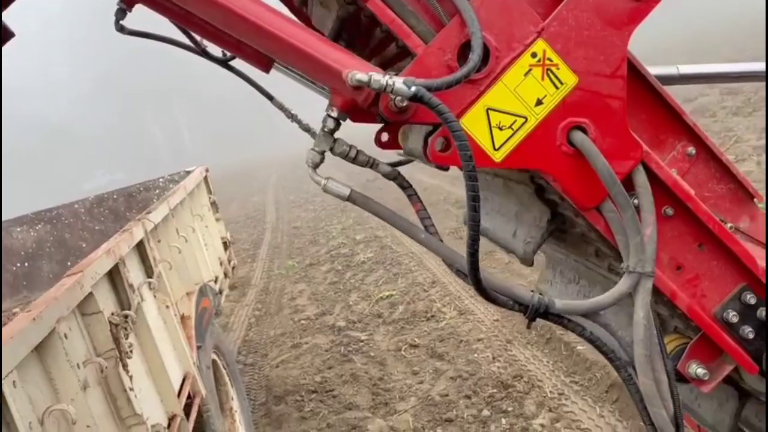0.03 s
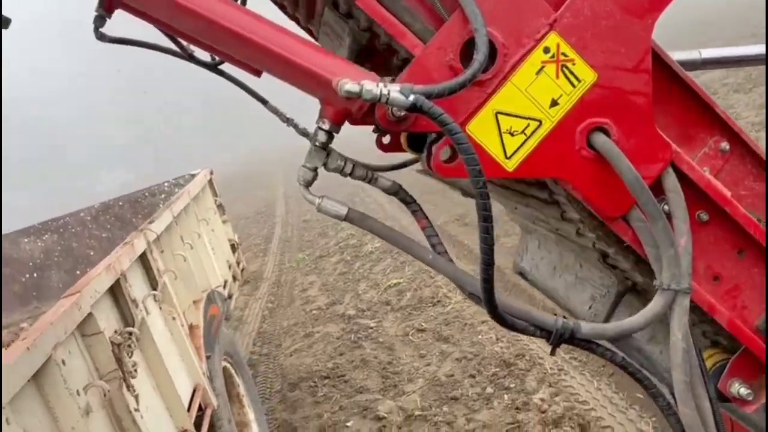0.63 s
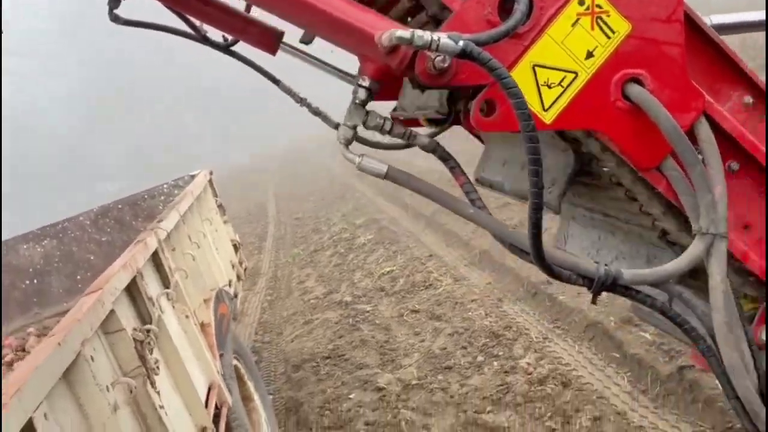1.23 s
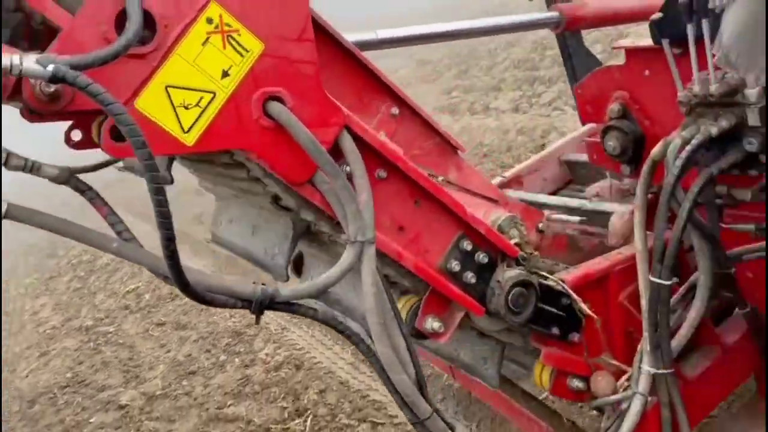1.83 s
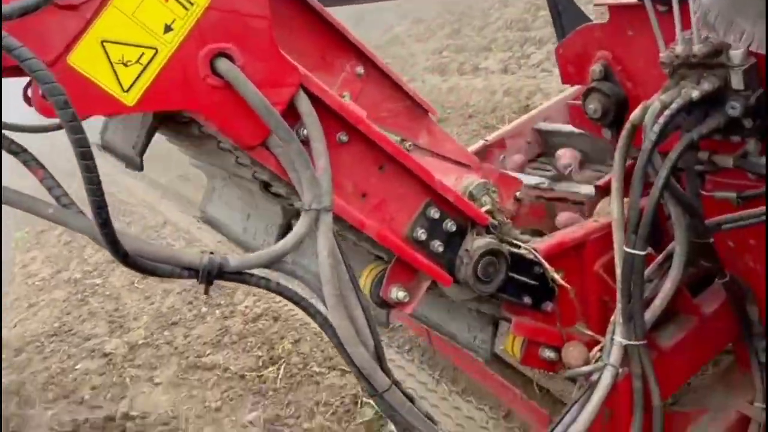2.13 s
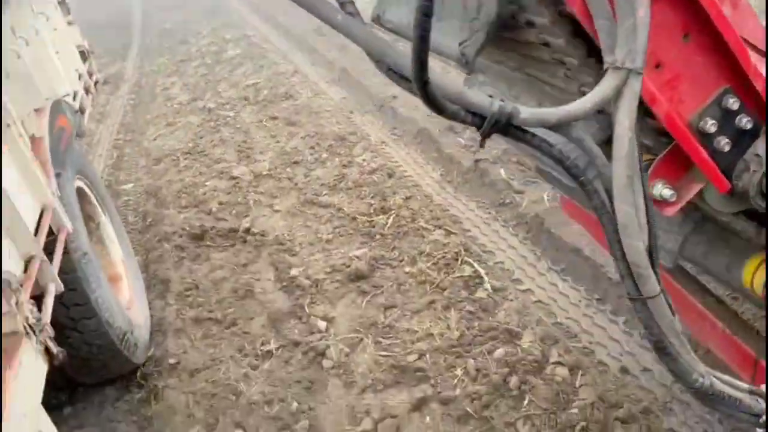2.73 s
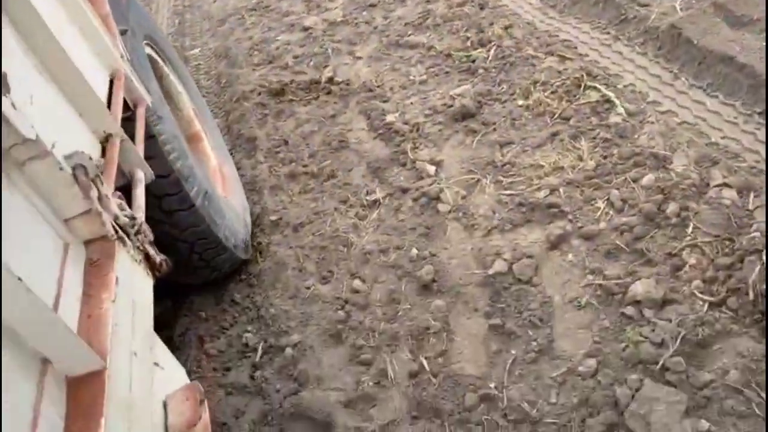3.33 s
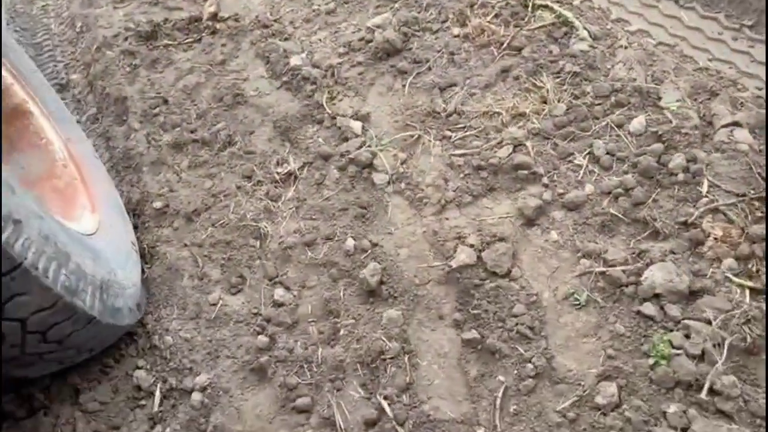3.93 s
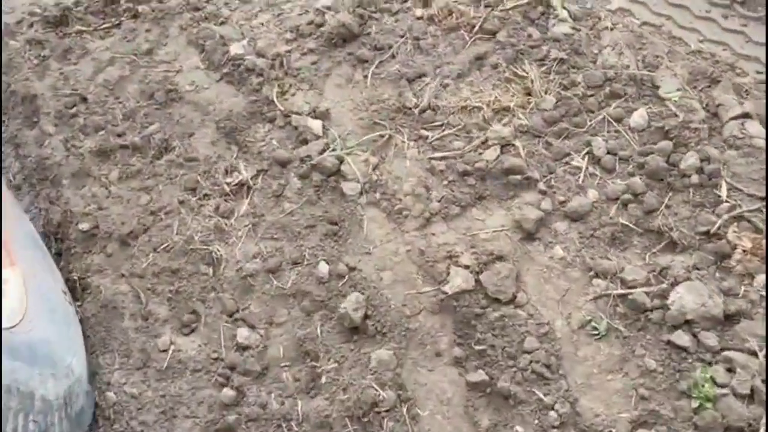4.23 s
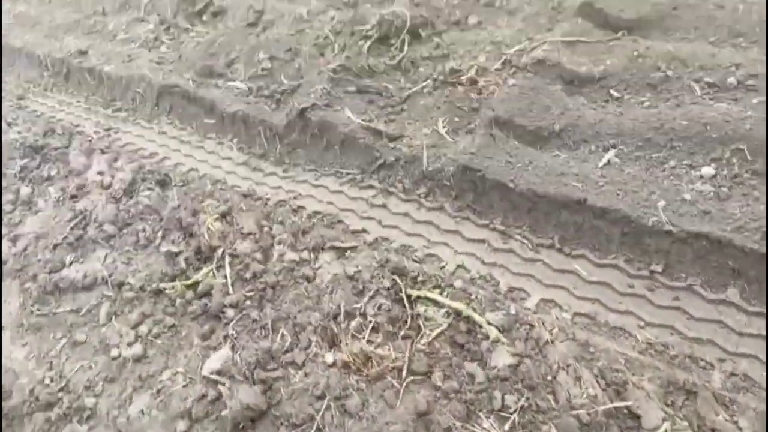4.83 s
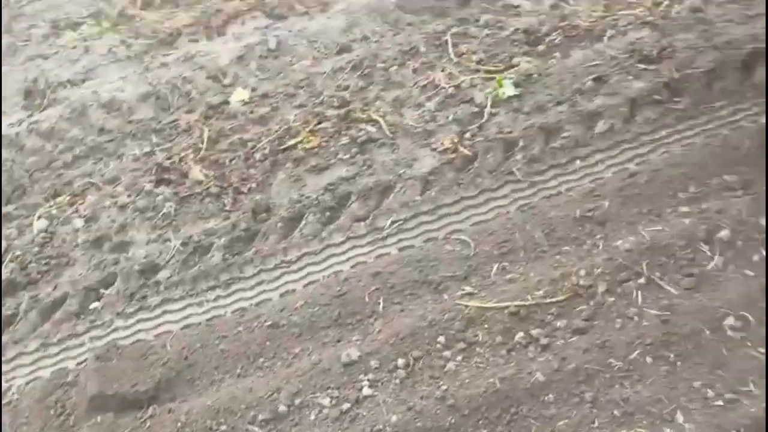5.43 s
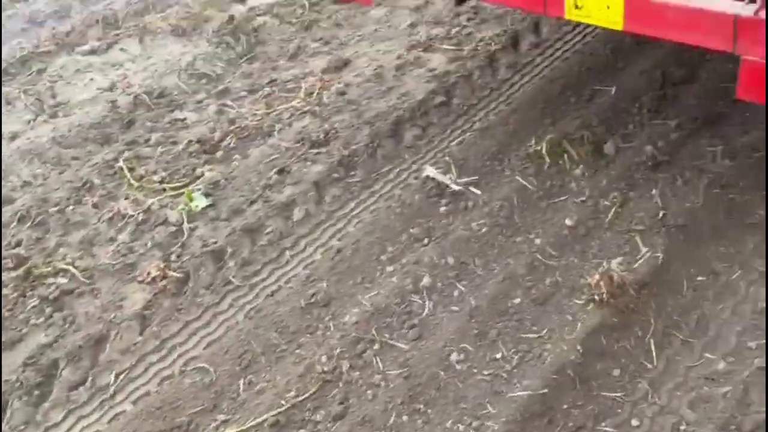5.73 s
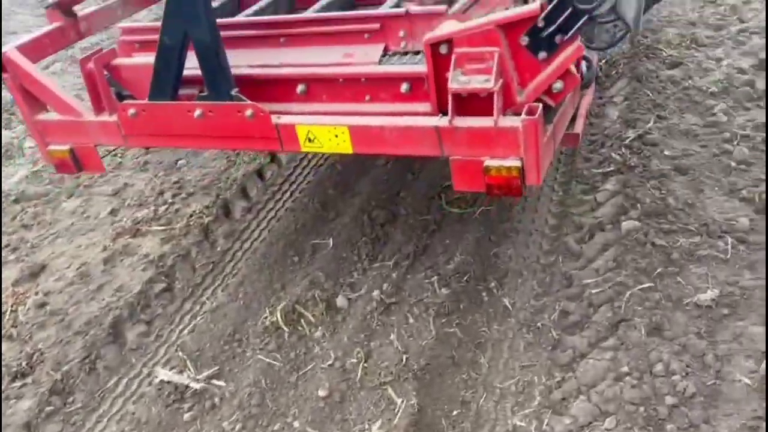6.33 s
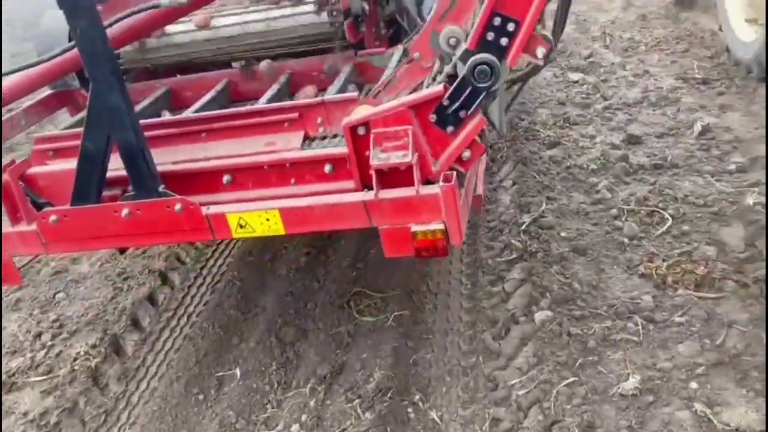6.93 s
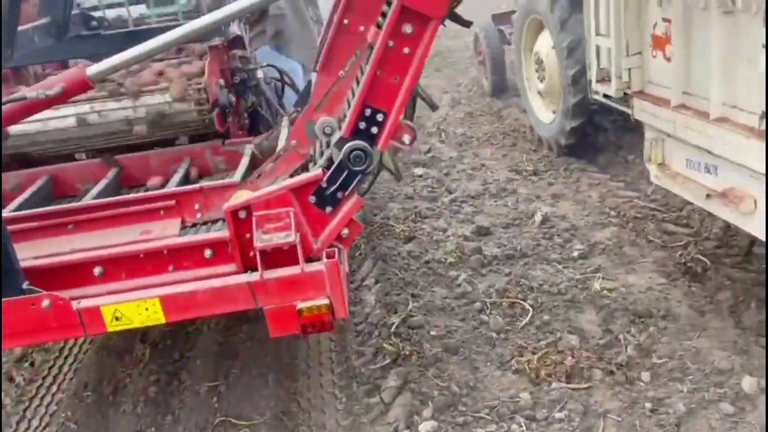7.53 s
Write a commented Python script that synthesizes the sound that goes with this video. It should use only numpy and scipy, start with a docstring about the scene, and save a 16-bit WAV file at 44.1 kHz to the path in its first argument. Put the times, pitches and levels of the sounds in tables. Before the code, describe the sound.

A potato harvester runs close by in an open field throughout: a low diesel drone, slightly to the right, under a rattling steel chain belt that clashes about four times a second. Light wind rumbles on the moving microphone. In the first two seconds pebbles click, stones knock on the frame and a few potatoes thud into a hollow metal bin. A panel hums at the start and again around 2 seconds, then fades. Sharp, ringing steel clacks are strongest from about 1.8 to 3 seconds. From 3.5 seconds the thuds become more frequent, while the rattle turns duller and a little quieter between 4 and 5.5 seconds. The exhaust swells near 4.7 seconds. From about 4.8 seconds potatoes and clods drum more heavily in the bin. The clatter brightens again near 6 seconds, with more clacks around 6.8, and everything continues until the end at about 7.6 seconds.

```python
"""First you hear a diesel drone and a rattling chain: a potato harvester works beside a tractor and
trailer in an open field while you walk alongside. A panel hums and wind rumbles on the microphone.
The web, a chain belt of steel rods, clashes about four times a second, with clicking pebbles and sharp
clacks in between. Potatoes and clods drum on the hopper, a hollow metal bin; stones knock on the frame.
Levels in the tables are relative: the functions set the final balance."""
import sys
import numpy as np
from scipy import signal
from scipy.fft import rfft, irfft, next_fast_len
from scipy.io import wavfile

SR = 44100
rng = np.random.default_rng(int(sys.argv[2]) if len(sys.argv) > 2 else 0)


def int16_out(signal):
    """Quantize to a 16-bit WAV file."""
    q = np.round(np.clip(np.atleast_2d(signal).T, -1, 1) * 32767)
    wavfile.write(sys.argv[1], SR, q.astype(np.int16))


N = 334719


def from_db(db):
    """Turn decibels into a gain."""
    return 10 ** (np.asarray(db) / 20)


def unit_power(x):
    """Scale a signal to an average power of 1."""
    return x / np.sqrt(np.mean(x ** 2) + 1e-20)


def over_time(rows):
    """Join a table's rows into smooth curves, one per value column."""
    times, *columns = np.transpose(rows)
    return [np.interp(np.arange(N) / SR, times, column) for column in columns]


def over_pitch(rows):
    """Read a table at every frequency of the spectrum."""
    hz, value = np.transpose(rows)
    return np.interp(np.log(np.fft.rfftfreq(next_fast_len(N), 1 / SR) + 1), np.log(hz), value)


def drift(rate):
    """A random wobble of size about 1 that changes about rate times a second."""
    r = np.exp(-80 * np.pi * rate / SR)
    slow = signal.lfilter([1], [1, -2 * r, r * r], rng.standard_normal(N // 40 + 2002))[2000:]
    return np.interp(np.arange(N) / 40, np.arange(len(slow)), unit_power(slow))


def taps(per_s, spread_db=0):
    """Tiny random hits of uneven strength, different at each ear."""
    hits = rng.random(N) < per_s / SR
    sizes = from_db(spread_db * np.minimum(rng.exponential(1, N), 3))
    return unit_power(hits * sizes * rng.uniform(-0.88, 1, (2, N)))


# How alike the two ears are. Each row: frequency in Hz, likeness from 0 to 1.
EAR_LIKENESS = [(60, 1), (140, 1), (300, 0.65), (600, 0.14), (1100, 0.49), (1800, 1), (2500, 0.64),
                (5000, 0.49), (7500, 0.62), (9000, 0.94), (12000, 0.9)]


def coloured(pair, colour):
    """Blend two noises into stereo with a tone colour, given as rows of Hz and dB."""
    size, alike = next_fast_len(N), np.clip(over_pitch(EAR_LIKENESS), 0, 1)
    mid, side = rfft(pair, size) * from_db(over_pitch(colour))
    mid, side = mid * np.sqrt(1 + alike), side * np.sqrt(1 - alike)
    return unit_power(irfft(np.array([mid + side, mid - side]), size)[:, :N])


def resonance(x, hz, width_hz):
    """Ring at one pitch; the narrower the width, the longer the ring."""
    r = np.exp(-np.pi * width_hz / SR)
    feedback = [1, -2 * r * np.cos(2 * np.pi * hz / SR), r * r]
    return signal.lfilter(np.array([1, 0, -1]) * (1 - r * r) / 2, feedback, x + 1e-18)


def ring(x, modes, uneven_db):
    """A struck thing rings at its own pitches (modes), each more or less as the hits move about."""
    return sum(resonance(x * from_db(db + uneven_db * drift(9.9)), hz, width) for hz, width, db in modes)


def clanks(x, low_hz, high_hz, width_hz, count):
    """From moment to moment other parts meet, each ringing at a few pitches of its own."""
    step, tail = SR // 20, SR // 10
    out = np.zeros((2, N + step + tail))
    for at in range(0, N, step):
        contacts = np.pad(x[:, at:at + step], ((0, 0), (0, tail)))
        pitches = low_hz * (high_hz / low_hz) ** ((np.arange(count) + rng.random(count)) / count)
        out[:, at:at + contacts.shape[1]] += sum(resonance(contacts, hz, width_hz) for hz in pitches)
    return out[:, :N]


def burst(start, db, swell_s, hold_s, t60_s, crack=0, crack_s=0.00071):
    """The power of one burst: it swells, may peak in a crack, holds, then falls 60 dB in t60_s."""
    power, at = np.zeros(N), int(start * SR)
    age = np.arange(min(SR // 2, N - at)) / SR
    fall_db = 60 * np.maximum(age - swell_s - hold_s, 0) / t60_s
    level = np.minimum(age / swell_s, 1) * from_db(db - fall_db)
    spike = 1 + crack * np.exp(-np.abs(age - swell_s) / crack_s)
    power[at:at + len(age)] = (level * spike) ** 2
    return power


def thuds(rows, build_s, linger_s=0.01):
    """Soft blows: a short tone builds and dies, while a share lingers in the metal."""
    out, age = np.zeros(N), np.arange(SR // 4) / SR
    for start, db, hz, share in rows:
        at = int(start * SR)
        blow = (age / build_s) * np.exp(1 - age / build_s)
        linger = share * (1 - np.exp(-age / build_s)) * np.exp(-age / linger_s)
        out[at:at + len(age)] += (from_db(db) * (blow + linger) * np.sin(2 * np.pi * hz * age))[:N - at]
    return out


def band_gain(x, low_hz, high_hz, db):
    """Turn one range of pitches up or down over time."""
    band = signal.sosfiltfilt(signal.butter(2, [low_hz, high_hz], "band", fs=SR, output="sos"), x)
    return x + (from_db(db) - 1) * band


def from_right(pair, lag_ms):
    """A sound from the right reaches the left ear later."""
    n = np.arange(N)
    return np.array([np.interp(n - lag_ms * SR / 1000, n, pair[0]), pair[1]])


def wavering_phase(hz, waver, rate):
    """The phase of a tone whose pitch wanders slightly."""
    return 2 * np.pi * np.cumsum(hz * (1 + waver * drift(rate))) / SR


# The engine's tones. Each row: multiple of the firing rate, level in dB.
ENGINE_TONES = [(1, -2), (1.5, -13), (2, -21), (3, -51), (4, -15.5), (5, -8.5)]
# Their loudness. Each row: time in seconds, level in dB.
ENGINE_LEVEL = [(0, -33.5), (1.9, -32), (2.25, -40), (2.9, -34), (3.6, -33.5), (4.7, -35), (5.3, -39),
                (5.9, -32), (7.59, -33.5)]
# Gear and pump whines. Each row: pitch in Hz, level in dB.
WHINES = [(612, -45), (1287, -58)]
# The exhaust's loudness. Each row: time in seconds, level in dB.
BOOM_LEVEL = [(0, -42), (1.0, -46), (1.5, -40), (2.2, -40), (2.9, -36), (3.7, -32.5), (4.25, -39),
              (4.65, -28), (5.0, -31), (5.4, -35), (6.1, -33), (7.0, -34.5), (7.59, -35)]
# Its tone colour. Each row: frequency in Hz, level in dB.
BOOM_COLOUR = [(60, -22), (80, 18.5), (98, 17), (112, 14.5), (130, 20.5), (150, 8), (200, -39)]
FIRING_HZ = 65.13


def diesel(boom_db=-3, rough=0.24, waver=0.00378):
    """The engine's firings make low tones, gears whine thinly and the exhaust booms in surges."""
    phase = wavering_phase(FIRING_HZ, waver, rate=1.76)
    tones = sum(from_db(db) * (1 + rough * drift(4)) * np.sin(k * phase + rng.uniform(0, 2 * np.pi))
                for k, db in ENGINE_TONES)
    whines = sum(from_db(db) * (1 + 0.33 * drift(26)) * np.sin(wavering_phase(hz, waver, rate=3.43))
                 for hz, db in WHINES)
    exhaust = coloured(rng.standard_normal((2, N)), BOOM_COLOUR)
    boom = from_db(boom_db + over_time(BOOM_LEVEL)[0]) * exhaust
    return np.sqrt(2) * (from_db(over_time(ENGINE_LEVEL)[0]) * tones + whines) + boom


# The working frame's loudness. Each row: time in seconds, level in dB.
FRAME_LEVEL = [(0.0, -30), (0.1, -27.5), (2.08, -28.5), (2.2, -33), (2.9, -30.5), (3.1, -28.5), (3.7, -29),
               (4.2, -29), (4.65, -33.5), (4.85, -33.5), (5.54, -33), (5.84, -30), (7.59, -30.5)]
# The tone colour of its drone. Each row: frequency in Hz, level in dB.
DRONE_COLOUR = [(50, -3), (90, 3), (150, 7), (230, 3.5), (290, 12), (350, 12), (450, 3.5), (540, 5.5),
                (650, 9), (900, 4), (1300, -1.5), (1600, -2.5), (2500, -23), (5000, -53)]
# How its panels ring. Each row: pitch in Hz, width in Hz, level in dB.
FRAME_MODES = [(435, 15, 8), (466, 5.9, -2), (623.8, 10, 7.5), (653, 14, -5), (671, 10, 4), (730, 15, -10),
               (830, 37, 1), (905, 27, 6), (950, 8.7, -3), (1018, 4.7, 9), (1315, 73, 1)]


def frame(drone_db=4, panel_db=-2, parts_db=-7, throb=0.043, surge_db=4.5):
    """Moving parts drone and throb with the engine; clods clatter on the panels in uneven surges."""
    pulse = 1 + throb * np.cos(2 * np.pi * FIRING_HZ * np.arange(N) / SR)
    parts = rng.standard_normal((2, N)) + from_db(parts_db) * taps(per_s=200, spread_db=0.5)
    drone = from_db(drone_db) * coloured(parts * pulse, DRONE_COLOUR)
    clods = coloured(taps(per_s=220, spread_db=2.5), [(200, -55), (450, 9.5), (1400, 16), (3000, -31)])
    clatter = unit_power(ring(clods, FRAME_MODES, uneven_db=5.5))
    clatter += 2.1 * unit_power(clanks(clods, 435.4, 1371, width_hz=22.5, count=4))
    panels = from_db(panel_db) * unit_power(clatter * from_db(surge_db * np.tanh(drift(11.7))))
    return from_db(over_time(FRAME_LEVEL)[0]) * (drone + panels)


# The rattle's loudness as you walk along. Each row: time in seconds, level in dB.
RATTLE_LEVEL = [(0, -29.5), (1.0, -30.5), (1.72, -30), (2.2, -34.5), (2.8, -34.5), (3.55, -32.5),
                (4.1, -35), (4.45, -39), (4.75, -34), (5.05, -39.5), (5.55, -35), (6.0, -35.5), (6.9, -35),
                (7.59, -34)]
# Its tone colour. Each row: frequency in Hz, level in dB.
RATTLE_COLOUR = [(600, -16), (1550, 6.5), (1950, 5), (2500, 5.5), (3300, 0.5), (5000, 0.5), (7000, -2),
                 (8600, 3.5), (10000, 3), (11400, 1.5), (12200, -78)]


def links(rattle_db=-3.5, tick_db=-9.5, flutter_db=2, scatter_s=0.0056):
    """Loose links rattle all the time; each tick scatters briefly through the web."""
    ticks = signal.lfilter([1], [1, -np.exp(-1 / (scatter_s * SR))], np.abs(taps(per_s=76)[0]))
    flutter = from_db(flutter_db * drift(34))
    activity = unit_power(np.sqrt(flutter ** 2 + from_db(tick_db) ** 2 * ticks / ticks.mean()))
    level = from_db(over_time(RATTLE_LEVEL)[0] + rattle_db)
    return level * activity * coloured(taps(per_s=4100), RATTLE_COLOUR)


# How the whole web rings. Each row: pitch in Hz, width in Hz, level in dB.
WEB_MODES = [(2000, 160, -4), (2505, 60, 1), (3270, 60, -1), (5300, 200, -9), (6780, 200, -5),
             (8400, 400, -4), (9120, 150, -5), (9780, 70, 8), (11100, 500, 7)]


def steel_web(hits, ring_db=-5, clank_db=-1):
    """Hits ring through the whole web and through ever-changing parts of it."""
    ringing = from_db(ring_db) * ring(hits, WEB_MODES, uneven_db=6)
    return hits + ringing + from_db(clank_db) * clanks(hits, 1735, 9250, width_hz=108, count=8)


# The hum's loudness. Each row: time in seconds, level in dB.
HUM_LEVEL = [(0, -30), (0.45, -43), (1.0, -45), (1.8, -30.5), (2.4, -34.5), (2.7, -44), (3.5, -50),
             (4.2, -58)]


def panel_hum(hz=272.6, rough=0.48):
    """A shaken panel hums at its own pitch and fades as you walk on."""
    phase = wavering_phase(hz, waver=0.0039, rate=4.8)
    return np.sqrt(2) * from_db(over_time(HUM_LEVEL)[0]) * (1 + rough * drift(10)) * np.sin(phase)


# The wind's tone colour. Each row: frequency in Hz, level in dB.
WIND_COLOUR = [(12, 4), (25, -20), (36, -17), (50, 29), (60, 25), (80, -11), (130, -55), (300, -46)]


def wind(wind_db=-41, gust_db=1):
    """Light gusts buffet the microphone with a deep rumble."""
    return from_db(wind_db + gust_db * drift(3.3)) * coloured(rng.standard_normal((2, N)), WIND_COLOUR)


# The crop rolling in. Each row: time in seconds, large potatoes in dB, small ones and clods in dB.
CROP_FLOW = [(0, -22, -38.5), (0.45, -36, -37), (0.62, -23, -45), (0.95, -33, -43), (1.75, -29.5, -33),
             (2.3, -33.5, -55), (2.9, -38, -60), (3.5, -62, -33), (3.85, -57, -26.5), (4.15, -33, -41),
             (4.45, -37.5, -30.5), (4.8, -28, -23.5), (4.92, -17, -27), (5.33, -24.5, -23),
             (5.5, -25.5, -27.5), (5.98, -23, -22.5), (6.4, -17.5, -35), (6.78, -19, -23),
             (6.98, -19.5, -47), (7.17, -27, -23), (7.59, -23.5, -39)]
# How the hopper rings. Each row: pitch in Hz, width in Hz, level in dB.
HOPPER_MODES = [(104, 5.1, -5), (124.6, 9.6, -6), (178, 12, -6.5), (195.8, 1.3, -0.5), (207, 11, 2.5),
                (230.5, 11.7, 3.5), (265, 12, 2), (298.3, 9.3, -3.5), (332, 10.3, 7.5), (349, 42, -1.5),
                (390, 14.4, 7), (438, 17, 4.5), (468, 22, -4)]


def rolling_crop(large_db=-4, small_db=-4.5, split_hz=250):
    """Potatoes pelt the hopper: large ones wake its low pitches, small ones its high pitches."""
    large, small = from_db(over_time(CROP_FLOW))
    pelting = coloured(taps(per_s=160, spread_db=0.5), [(60, 11.5), (500, 4.5), (1200, -41)])
    low = ring(pelting, [mode for mode in HOPPER_MODES if mode[0] < split_hz], uneven_db=1)
    high = ring(pelting, [mode for mode in HOPPER_MODES if mode[0] >= split_hz], uneven_db=4)
    return from_db(large_db) * large * unit_power(low) + from_db(small_db) * small * unit_power(high)


# The tone colour of steel hitting steel. Each row: frequency in Hz, level in dB.
CONTACT_COLOUR = [(400, 6), (900, 1.5), (1300, 4.5), (1550, 3.5), (2000, -1.5), (2700, 1.5), (3600, -1),
                  (5000, 1), (6300, 2), (7400, 3.5), (8600, 9), (10000, 12), (11550, 5.5), (12000, -65),
                  (12600, -59)]


def steel_contacts():
    """Rods and links touch thousands of times a second: the raw sound of clashes and clacks."""
    return coloured(taps(per_s=14000, spread_db=1.5), CONTACT_COLOUR)


# The web's regular clashes. Each row: start in seconds, level in dB.
CLASHES = [(0.044, -22), (0.28, -21.5), (0.515, -23), (0.755, -24), (0.992, -19), (1.229, -22.5),
           (1.469, -20.5), (1.707, -19.5), (1.946, -21.5), (2.186, -26.5), (2.428, -23.5), (2.662, -27.5),
           (2.908, -24.5), (3.143, -24), (3.378, -22.5), (3.629, -20), (3.871, -25), (4.116, -26),
           (4.351, -25), (4.592, -27.5), (4.834, -26.5), (5.156, -27.5), (5.396, -24.5), (5.642, -25),
           (5.884, -26.5), (6.126, -26), (6.369, -24), (6.61, -24.5), (6.861, -38), (7.11, -23.5),
           (7.344, -23.5)]


def clashes(contacts):
    """Each clash is a rush of contacts that swells and dies."""
    power = sum(burst(start, db, swell_s=0.0082, hold_s=0.015, t60_s=0.21) for start, db in CLASHES)
    return np.sqrt(power) * contacts


# Pebbles hitting the rods. Each row: start in seconds, level in dB, pitch in Hz.
PEBBLES = [(0.2444, -23, 6900), (0.3207, -22, 6350), (0.3591, -18.5, 6480), (0.464, -27, 6040),
           (0.7932, -14, 7990), (0.922, -20, 6600), (1.055, -26, 7300), (1.1313, -24, 6660),
           (1.28, -19, 6800), (1.5888, -20, 5700), (1.7913, -21, 8000), (2.5236, -28.5, 6200),
           (3.12, -27, 6400), (5.034, -35.5, 5960), (6.487, -29, 5600), (6.703, -29, 5700)]


def pebbles(grit_db=-1, spread_db=1, width_hz=1100, decay_s=0.0035, grit_count=420):
    """Each pebble clicks at its own pitch; smaller grit clicks at random along the chain."""
    when, softness, pitch = rng.random((grit_count, 3)).T
    starts = when * (N - 1) / SR
    levels = np.interp(starts, *np.transpose(RATTLE_LEVEL)) + grit_db - spread_db * (2 * softness - 1)
    grit = np.transpose([starts, levels, 2000 * 4 ** pitch])
    out, age = np.zeros((2, N + SR)), np.arange(SR // 40) / SR
    for start, db, hz in PEBBLES + list(grit):
        at = int(start * SR)
        shared, per_ear = rng.standard_normal(len(age)), rng.standard_normal((2, len(age)))
        click = unit_power(resonance(shared + 0.5 * per_ear, hz, width_hz)) * np.exp(-age / decay_s)
        out[:, at:at + len(age)] += from_db(db) * click
    return out[:, :N]


# Sharp clacks of steel on steel. Each row: start in seconds, level in dB,
# seconds to fade by 60 dB, the side frame's share of the blow in dB.
CLACKS = [(0.5194, -12, 0.13, -12), (0.838, -12.5, 0.1, -8), (1.222, -14, 0.035, -9),
          (1.473, -25, 0.06, -10), (1.869, -7.5, 0.12, -6), (2.118, -5.5, 0.086, -5),
          (2.363, -8, 0.15, -5.5), (2.595, -6.5, 0.12, -7), (2.9029, -12, 0.1, -19),
          (3.076, -13.5, 0.21, -20), (3.29, -17, 0.025, -13), (3.962, -23.5, 0.12, -6),
          (4.511, -24.5, 0.42, -7), (5.102, -24, 0.12, -13), (5.593, -24.5, 0.049, -24),
          (6.079, -23.5, 0.053, -3), (6.778, -15, 0.16, -6), (6.872, -17, 0.2, 1.5), (7.037, -22, .08, -4),
          (7.293, -23, 0.091, -8), (7.467, -20.5, 0.079, -2)]
# The side frame's tone colour. Each row: frequency in Hz, level in dB.
CLANK_COLOUR = [(500, -15), (900, 4), (1300, 2), (1900, -3.5), (2700, -1.5), (3600, -7), (6000, -26)]
CLACK_SWELL_S = 0.003


def clacks(contacts, clack_db=-6, clank_db=-6, crack=0.3):
    """A sudden blow peaks in a crack, makes the web clang and clanks on the side frame."""
    web_power, side_power = np.zeros((2, N))
    for start, db, t60, share_db in CLACKS:
        web_power += burst(start, db, CLACK_SWELL_S, 0, t60, crack)
        side_power += burst(start, db + share_db, CLACK_SWELL_S, 0, t60, crack)
    blows = np.sqrt(web_power) * contacts
    clang = clanks(blows, 1800, 5000, width_hz=50, count=7)
    clank = from_db(clank_db) * np.sqrt(side_power) * coloured(rng.standard_normal((2, N)), CLANK_COLOUR)
    return from_db(clack_db) * (blows + clang + clank)


# How one rod rings. Each row: pitch in Hz, level in dB, seconds to fade by 60 dB.
ROD_MODES = [(1260, -7, .16), (2120, -9.5, 0.078), (2300, -25, 0.13), (2515, -14.5, 0.42),
             (2770, -10, 0.24), (2930, -53, .14), (3290, -14.5, 0.29), (3820, -18, .09), (4651, -8, 0.14),
             (5180, -7.5, 0.16), (6100, -12, 0.19)]


def rods(ring_db=-14, uneven_db=6):
    """Every clack sets a rod ringing, each time with a new balance of its pitches."""
    out, age = np.zeros((2, N + SR)), np.arange(SR // 4) / SR
    for start, clack_db, *_ in CLACKS:
        at = int((start + CLACK_SWELL_S) * SR)
        for hz, db, t60 in ROD_MODES:
            phase = rng.uniform(0, 2 * np.pi) + rng.standard_normal((2, 1))  # differs at each ear
            level = from_db(clack_db + ring_db + db - uneven_db * rng.random() - 60 * age / t60)
            out[:, at:at + len(age)] += level * np.sin(2 * np.pi * hz * age + phase)
    return out[:, :N]


# Heavy drops on the sheet metal. Each row: start in seconds, level in dB, pitch in Hz, lingering share.
DROPS = [(0.548, -9, 190.5, 0.5), (0.57, -14, 274, 0.27), (0.615, -14, 278, .3), (1.674, -14, 236, 0.57),
         (1.701, -16.5, 231, 0.65), (3.438, -22, 356, .2), (3.551, -19, 343, 0.46), (3.685, -16, 343, .15),
         (3.799, -19, 328, 0.72), (3.885, -15, 346, 0.18), (3.936, -18, 333, 0.17), (3.971, -15, 212, .3),
         (4.015, -17, 363, 0.22), (4.078, -19.5, 365, 0.36), (4.106, -17.5, 219, .5),
         (4.126, -15.5, 310, .2), (4.189, -21.5, 327, 0.96), (4.389, -24, 355, .2),
         (4.854, -3.5, 215, 0.11), (4.876, -14, 187, 0.4), (4.9, -7.5, 201.4, 0.59),
         (4.965, -8.5, 227.4, 0.5), (4.995, -17, 218, 0.26), (5.024, -15, 206, 0.93),
         (5.105, -10.5, 204, 0.63), (5.114, -9, 330, 0.32), (5.22, -8.5, 233.5, 0.54),
         (5.252, -10, 272, 0.36), (5.278, -9.5, 227, 0.57), (5.355, -14, 198, 0.54), (5.615, -15, 349, .3),
         (5.655, -18.5, 431, 0.53), (5.814, -9, 215, 0.36), (5.889, -14, 360, .2), (5.958, -21, 216, .3),
         (6.057, -3.5, 337, 0.15), (6.074, -3.5, 309, 0.11), (6.089, -6, 211.4, 0.39),
         (6.111, -10, 378, 0.43), (6.224, -14, 203, .3), (6.271, -5, 336, 0.11), (6.39, -13, 225, 0.54),
         (6.43, -20, 255, 0.35), (6.536, -14, 366, 0.25), (6.556, -10.5, 266, 0.27),
         (6.589, -10.5, 160, 0.41), (6.647, -27, 235, 0.34), (6.717, -14, 389.5, 0.54),
         (6.747, -8.5, 199.5, 0.28), (7.065, -12.5, 198, 0.25), (7.09, -4, 348, 0.17),
         (7.165, -11, 183, .25), (7.192, -12, 345, 0.33), (7.377, -6.5, 320, 0.11)]
# The tone colour of tumbling crop. Each row: frequency in Hz, level in dB.
TUMBLE_COLOUR = [(70, -26), (190, -1), (380, 2), (520, -1.5), (750, -8), (1400, -14), (3000, -58)]


def falling_crop(drop_db=-7.5, tumble_db=-19):
    """A potato or clod lands with a soft thud, tumbles briefly and makes the hopper ring."""
    landings = from_db(drop_db) * thuds(DROPS, build_s=0.003, linger_s=0.058)
    power = sum(burst(start, db, swell_s=0.0084, hold_s=0.0068, t60_s=0.3) for start, db, *_ in DROPS)
    tumble = from_db(tumble_db) * np.sqrt(power) * coloured(taps(per_s=900), TUMBLE_COLOUR)
    hits = landings + tumble
    return hits + ring(hits, HOPPER_MODES, uneven_db=0.5)


# Stones and clods hitting the frame. Each row: start in seconds, level in dB, pitch in Hz.
KNOCKS = [(0.711, -18, 970), (0.889, -26, 600), (0.948, -18, 650), (1.159, -16.5, 1030), (1.224, -32, 1020),
          (1.422, -18, 960), (1.645, -20, 700), (3.08, -19, 1050), (3.1, -27, 555), (3.543, -14, 550),
          (3.95, -17, 640), (3.985, -22, 670), (4.125, -24, 795), (5.617, -23, 620), (5.83, -31, 600),
          (6.071, -19, 643), (6.268, -30, 906), (7.204, -18.5, 670), (7.385, -21, 664)]


def knocks(knock_db=-2, grit_db=-10):
    """A big stone or clod knocks with a burst of grit, and the frame's panels ring."""
    blows = from_db(knock_db) * thuds([(start, db, hz, 0) for start, db, hz in KNOCKS], build_s=0.002)
    power = sum(burst(start, db, swell_s=0.0011, hold_s=0.0018, t60_s=0.058) for start, db, _ in KNOCKS)
    grit = coloured(taps(per_s=4700), [(300, -33), (600, 13), (1300, 2), (4000, -24)])
    hits = blows + from_db(grit_db) * np.sqrt(power) * grit
    return hits + ring(hits, FRAME_MODES, uneven_db=2)


def chain(lag_ms, shade):
    """All the chain's sounds together; turning away dulls the treble, most at the right ear."""
    contacts = steel_contacts()
    hits = clashes(contacts) + clacks(contacts) + from_right(links(), lag_ms)
    sound = steel_web(hits) + rods() + from_right(pebbles(), lag_ms)
    sound = band_gain(sound, 7900, 18300, 0.67 * shade)
    return band_gain(sound, 4230, 7400, np.array([-0.3 * shade, 0.18 * shade]))  # left up, right down


# You turn as you walk. Each row: time in seconds, the left ear's delay in milliseconds
# for the machine, the same for the rattle, treble shade (lower is duller).
TURNING = [(0, 0.25, 0.0063, -4.5), (2.3, 0.29, 0, -1.5), (3.5, 0.19, 0.0016, -8.5),
           (4.1, 0.37, 0.24, -17.5), (4.9, 0.17, 0.33, -18.5), (5.6, 0.35, 0.257, -10),
           (6.1, 0.22, 0.004, -3.5), (7.59, 0.099, 0, -7)]
# The range around 2 kHz swells and dips slightly, sounding hollowest near 5.5 seconds.
# Each row: time in seconds, level in dB.
MID_LEVEL = [(0, -1), (2.6, 1.5), (3.6, 0.5), (4.2, 2), (4.7, -0.5), (5.0, -2), (5.45, -5.5), (5.9, -1),
             (6.2, 1.5), (7.59, 0.5)]


def scene():
    """Engine, frame and hopper are off to the right, the chain ahead, the wind on the microphone."""
    machine_lag_ms, rattle_lag_ms, shade = over_time(TURNING)
    drone = diesel() + panel_hum()
    framework = band_gain(frame() + knocks(), 520, 3000, 0.1 * shade)
    crop = falling_crop() + rolling_crop()
    lean_right = from_db([[-0.6], [0.6]])
    machine = from_right(drone + (framework + crop) * lean_right, machine_lag_ms)
    harvester = machine + chain(rattle_lag_ms, shade)
    return band_gain(harvester, 1450, 2900, over_time(MID_LEVEL)[0]) + wind()


# How the microphone's openings ring, left then right. Each row: pitch in Hz, width in Hz.
MIC_PORTS = [(9550, 1040), (10850, 1400)]
CUTOFF_HZ = 12350


def record(dry):
    """Each opening shifts the phase near its own pitch; peaks are clipped and the top treble is cut."""
    ports = np.array([x - 2 * resonance(x, hz, width) for x, (hz, width) in zip(dry, MIC_PORTS)])
    low_pass = signal.ellip(10, 0.1, 80, CUTOFF_HZ, fs=SR, output="sos")
    return signal.sosfilt(low_pass, np.clip(ports, -0.85, 0.85))


dry = scene()
out = record(dry)
int16_out(out)
```